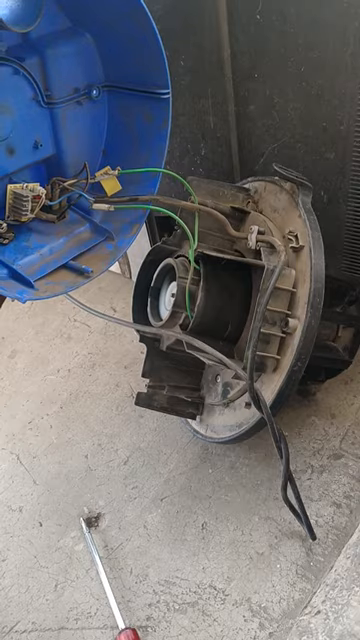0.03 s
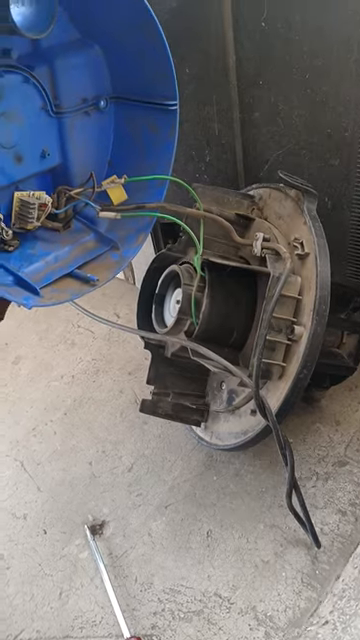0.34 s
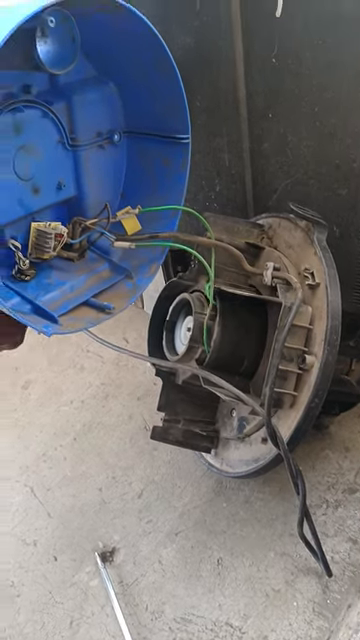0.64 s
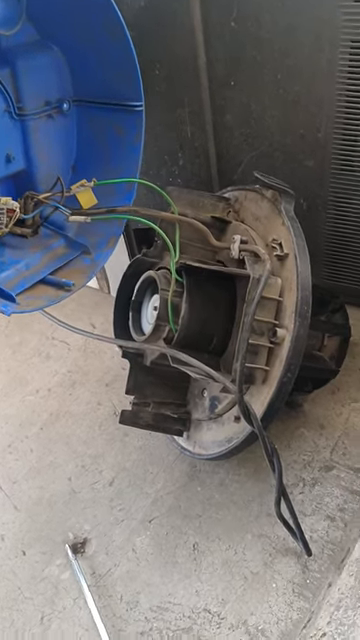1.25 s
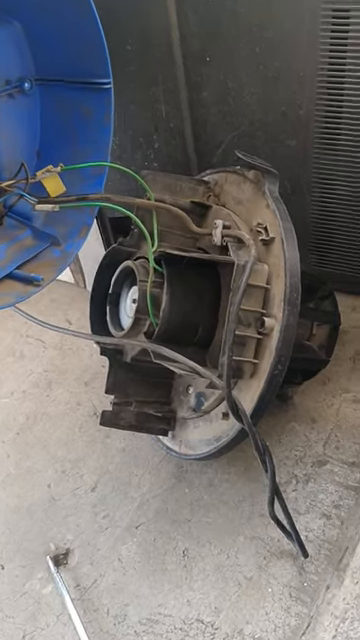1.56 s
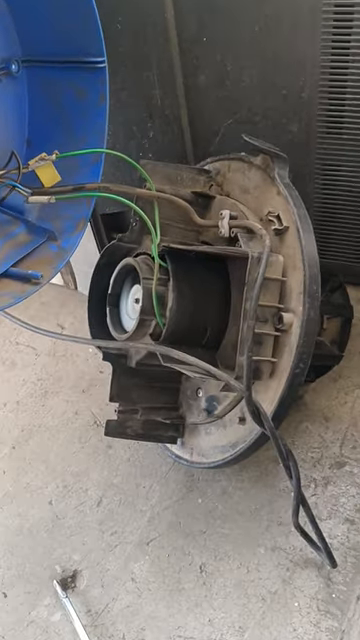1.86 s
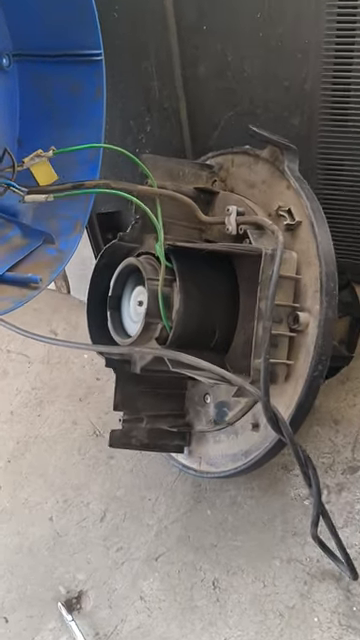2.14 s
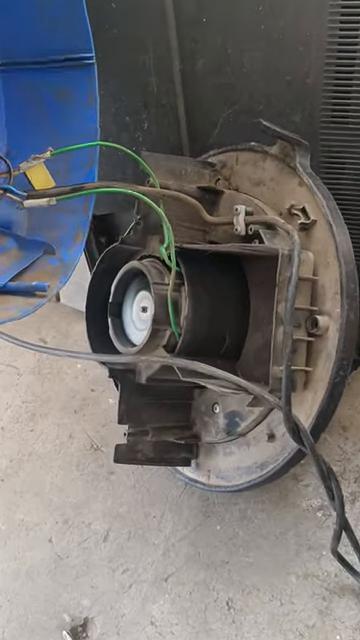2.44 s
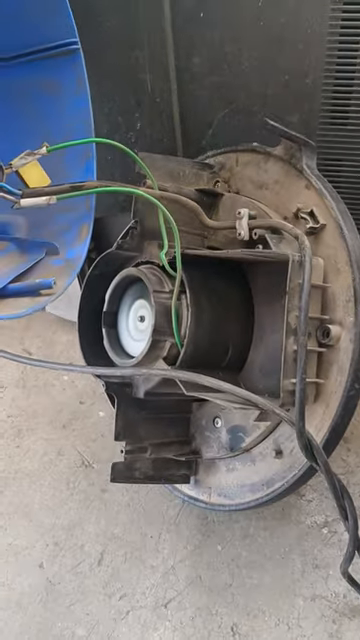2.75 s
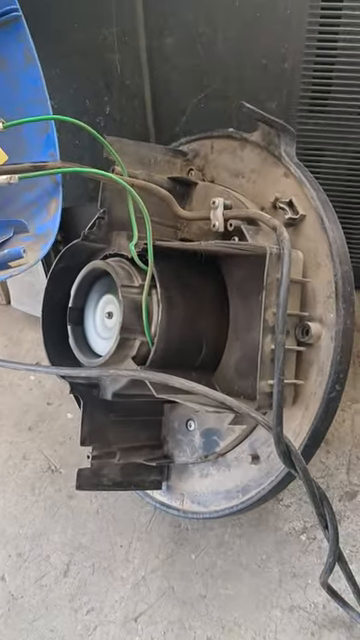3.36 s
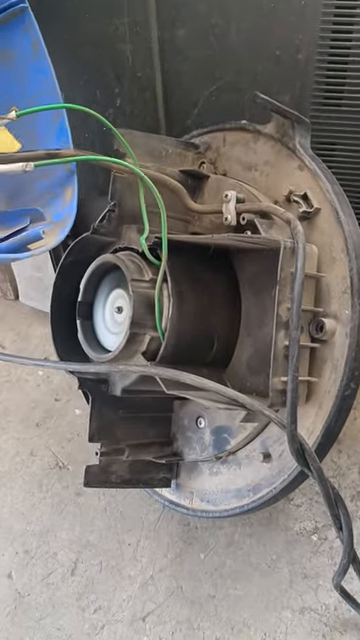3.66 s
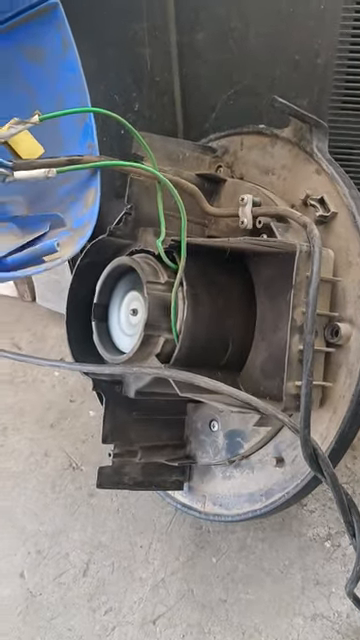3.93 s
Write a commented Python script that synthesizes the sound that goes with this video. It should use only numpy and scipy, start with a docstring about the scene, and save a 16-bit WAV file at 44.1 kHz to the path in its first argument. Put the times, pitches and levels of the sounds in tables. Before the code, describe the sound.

An opened vacuum cleaner motor runs on a concrete floor, heard from about 0.2 seconds with a steady, hissing roar of air. Its wavering whine and hum climb in pitch until about 1.4 seconds, with a faint hoot underneath near 0.7. The pitch holds until 2.2, then falls through to 4 seconds as the motor slows without stopping. The microphone moves in close between 1.7 and 3 seconds.

```python
"""A rising whine over roaring air: an opened vacuum cleaner motor runs on a concrete floor.
It speeds up, holds, then slows as the airflow changes. Two sets of blades whine at 9 and 12 times
the shaft rate, the shaft hums on its first four orders, and air roars through the housing.
The microphone starts a step away and moves in close; standing waves make each tone swell and fade
differently on the two sides. A faint hoot passes once, early on."""
import sys
import numpy as np
from scipy import signal
from scipy.fft import rfft, irfft
from scipy.io import wavfile

SR = 44100
rng = np.random.default_rng(int(sys.argv[2]) if len(sys.argv) > 2 else 0)


def dump(signal):
    """Clip the signal to [-1, 1] and save it as 16-bit WAV at the path in sys.argv[1]."""
    limited = np.clip(np.atleast_2d(signal).T, -1, 1)
    pcm = np.round(limited * 32767).astype(np.int16)
    wavfile.write(sys.argv[1], SR, pcm)


N = 176400
TIME = np.arange(N) / SR
HZ = np.maximum(np.arange(N // 2 + 1) * SR / N, 1)
WHINE_FLUTTER, HUM_FLUTTER = 0.27, 0.2   # share of a tone's amplitude
HUM_LEAD_FAR, HUM_LEAD_NEAR = -1.25, 0.1   # radians, left ahead of right

# Main whine on each side of the microphone. Each row: time in seconds, level in dB before the dips.
MAIN_WHINE_LEFT = [(.2,-29), (.51,-25.5), (.7,-35), (.93,-22), (1.22,-31), (1.75,-40), (1.9,-28),
                   (2.04,-44), (2.31,-21), (2.56,-37), (2.66,-21.5), (2.87,-27), (3.25,-21.5), (3.35,-33),
                   (4.0,-37)]
MAIN_WHINE_RIGHT = [(.25,-21.5), (.62,-24), (.8,-21), (.96,-23), (1.05,-39), (1.17,-24.5), (1.85,-31),
                    (2.05,-40), (2.17,-24), (2.28,-26), (2.36,-23.5), (2.6,-17), (3.15,-17), (3.26,-26),
                    (3.6,-22), (4.0,-19)]
# Its phase across the microphone. Each row: time in seconds, lead of the left side in radians.
MAIN_WHINE_LEAD = [(.2, 2), (.85, 0), (1.05, -0.9), (1.22, 4), (1.55, 3.5), (1.85, 0), (2.25, 3.5),
                   (2.37, -.5), (2.6, 4), (3.25, 1.5), (3.9, 4.5)]
# Its brief dips. Each row: centre in seconds, spread in seconds.
MAIN_WHINE_DIPS = [(.41, .022), (.57, 0.0093), (.64, .025), (2.5, 0.021), (2.81, 0.026), (3.33, 0.044)]
# Upper whine at the microphone. Each row: time in seconds, left and right level in dB.
UPPER_WHINE = [(.19,-52,-52), (.52,-48,-28), (.82,-43,-35), (1.15,-38,-22), (2.25,-36,-28), (2.7,-52,-40),
               (3.3,-49,-27), (3.7,-47,-51)]

def blade_whine(angle, dip_db=11):
    """Nine blades give the main whine, which dips now and then; twelve give a higher one."""
    dips = sum(bell(s, spread_s) for s, spread_s in MAIN_WHINE_DIPS)
    level_db = np.vstack([in_time(MAIN_WHINE_LEFT), in_time(MAIN_WHINE_RIGHT)]) - dip_db * dips
    main = tone(9 * angle, level_db, in_time(MAIN_WHINE_LEAD), WHINE_FLUTTER)
    upper = tone(12 * angle, in_time(UPPER_WHINE), lead=-2.2, flutter=WHINE_FLUTTER)
    return main + upper


# Air spectrum before flow, band gains and housing; the middle is heard a step away and close up.
# Each row: frequency in Hz, left and right density in dB per Hz.
ROAR_BASS = [(48.3, -92, -92), (69.4, -71.5, -74), (92, -72.5, -75.5), (139.6, -61.5, -61), (234, -66, -68)]
ROAR_MIDDLE_FAR = [(620, -67, -64), (1220, -62.5, -59), (1360, -69, -67.5), (1730, -62.5, -57.5),
                   (2300, -58, -60.5), (3200, -62, -57), (4530, -63, -57), (6070, -63.5, -53.5)]
ROAR_MIDDLE_NEAR = [(332, -62, -58), (676, -64, -63), (984, -60, -63.5), (1130, -54.5, -55.5),
                    (1420, -61, -65), (2420, -61, -57), (3600, -59, -54), (4400.0, -62.5, -60),
                    (6060, -65, -53.5)]
ROAR_TREBLE = [(6600, -67.2, -65.5), (7920, -60.5, -73.5), (9190, -68.5, -79), (11260, -78.5, -76.3),
               (15400, -73, -70.2)]
# Swell of the whole airflow, and of its rumble alone. Each row: time in seconds, gain in dB.
FLOW_GAIN = [(.22, -7), (.35, 0.5), (.6, 1), (1.4, -0.05), (1.7, .5), (2.6, 0), (2.85, 0.8), (3.06, -2),
             (3.22, 0.9), (4.0, -0.8)]
RUMBLE_GAIN = [(.5, 4), (1.0, 0), (2.75, -4), (3.25, 0), (4.0, -1)]

def air_roar(speed, rumble_top_hz=201, hiss_from_hz=8000, hiss_db_per_doubling=8.5):
    """Turbulent air through the housing: a low rumble, the roar, and a hiss that grows with speed."""
    noise = turbulence()
    low = 1 / (1 + (HZ / rumble_top_hz) ** 8)
    high = 1 - 1 / (1 + (HZ / hiss_from_hz) ** 8)
    hiss_gain = from_db(hiss_db_per_doubling * np.log2(speed / speed.mean()))
    bands = [(low, from_db(in_time(RUMBLE_GAIN))), (1 - low - high, 1), (high, hiss_gain)]
    air, near = 0, nearness()
    for middle, share in ((ROAR_MIDDLE_FAR, 1 - near), (ROAR_MIDDLE_NEAR, near)):
        spectrum = noise * from_db(over_hz(ROAR_BASS + middle + ROAR_TREBLE))
        air = air + share * sum(gain * irfft(spectrum * band, N) for band, gain in bands)
    return housing(air) * from_db(in_time(FLOW_GAIN))


# How alike the air sounds on the two sides of the microphone.
# Each row: frequency in Hz, coherence from 0 to 1, lead of the left side in radians.
AIR_COHERENCE = [(200, 0.9, 0), (630, 0.84, -0.98), (990, 0.55, -1.6), (1195, 0.13, .5), (2480, 0.17, 0.4),
                 (3210, 0.43, 3), (4960, 0.04, 2.5)]

def turbulence():
    """Flat stereo spectrum of rushing air, nearly alike on both sides in the bass, wide in the treble."""
    coherence, lead = over_hz(AIR_COHERENCE)
    coherence = np.clip(coherence, 0, 1)
    white = rfft(rng.standard_normal((2, N))) * np.sqrt(SR) / 2
    mid, side = white * np.sqrt([1 + coherence, 1 - coherence])
    return np.array([(mid + side) * np.exp(1j * lead), mid - side])


# Resonances and one hollow of the housing, heard from certain places only. Each row: centre and
# width in Hz, left and right gain in dB, strongest moment and spread in seconds.
HOUSING_RESONANCES = [(2350, 230, 8.5, 5, 0.46, 0.68), (1820, 90, 5, 3.5, 0.54, 0.63),
                      (2590, 180, 8, 4.5, 1.86, .22), (1780, 830, -2.5, -3, 2.82, 0.41),
                      (2330, 130, 6, 5.5, 3.25, 1), (1630, 140, -1, 6, 3.86, 0.76)]

def housing(air):
    """Each resonance or hollow colours the air while the microphone passes through it."""
    for hz, width_hz, left_db, right_db, s, spread_s in HOUSING_RESONANCES:
        band = irfft(rfft(air) / (1 + (2 * (HZ - hz) / width_hz) ** 2), N)
        gain = from_db(np.outer([left_db, right_db], bell(s, spread_s)))
        air = air + band * (gain - 1)
    return air


# Shaft orders 1 and 2 at the microphone. Each row: time in seconds, left and right level in dB.
HUM_1 = [(.19,-50,-46), (.67,-42,-25.5), (.85,-45,-35.5), (1.2,-36,-33.5), (2.42,-36.5,-31), (2.68,-46,-49),
         (2.87,-33.5,-42), (3.2,-48,-39), (3.67,-34,-32), (3.99,-40.5,-38)]
HUM_2 = [(.3,-47,-52), (.58,-37,-36), (.72,-39,-37.5), (.95,-30,-27.5), (1.87,-43,-32.5), (2.27,-53,-28),
         (2.43,-31.5,-40), (2.67,-39.5,-40.5), (3.31,-31,-31), (3.99,-41,-41.5)]
# Orders 3 and 4, equally loud on both sides. Each row: time in seconds, level in dB.
HUM_3 = [(.19,-57), (1.5,-39), (2.33,-41.5), (2.6,-50), (4.0,-48)]
HUM_4 = [(.19,-45), (1.05,-32.5), (1.4,-46), (2.05,-35.5), (2.6,-55), (3.35,-35.5), (3.99,-45)]

def shaft_hum(angle):
    """The unbalanced rotor hums on four orders; close up, the two sides are almost in phase."""
    lead = HUM_LEAD_FAR + (HUM_LEAD_NEAR - HUM_LEAD_FAR) * nearness()
    return sum(tone(order * angle, in_time(levels), lead, HUM_FLUTTER)
               for order, levels in enumerate((HUM_1, HUM_2, HUM_3, HUM_4), 1))


def hoot(start_s=0.61, length_s=0.287, base_hz=597, rise_hz=57.8, peak_db=-38):
    """A faint short tone rises and falls once under the roar."""
    arch = np.sin(np.pi * np.clip((TIME - start_s) / length_s, 0, 1))
    angle = 2 * np.pi * np.cumsum(base_hz + rise_hz * arch ** 2) / SR
    return np.sqrt(np.abs(arch)) * tone(angle, peak_db, HUM_LEAD_FAR, WHINE_FLUTTER)


def tone(angle, level_db, lead, flutter, flutter_hz=27):
    """One stereo partial, shaken in strength and phase by turbulence; left leads by `lead` radians."""
    gusts = np.array([drift(flutter_hz) + 1j * drift(flutter_hz) for side in range(2)])
    shaken = 1 + flutter * gusts / np.sqrt(2)
    phase = angle + rng.uniform(0, 2 * np.pi) + lead * np.array([[.5], [-.5]])
    return np.sqrt(2) * from_db(level_db) * (shaken * np.exp(1j * phase)).real


def nearness(start_s=1.73, end_s=2.97):
    """0 while the microphone is a step from the motor, 1 once it is close."""
    return np.clip((TIME - start_s) / (end_s - start_s), 0, 1)


def drift(corner_hz):
    """Slow random wander with a spread of 1."""
    slow = irfft(rfft(rng.standard_normal(N)) / (1 + (HZ / corner_hz) ** 2), N)
    return slow / slow.std()


def bell(centre_s, spread_s):
    """A smooth swell to 1 and back."""
    return np.exp(-((TIME - centre_s) / spread_s) ** 2)


def from_db(db):
    """Decibels to gain."""
    return 10 ** (np.asarray(db) / 20)


def in_time(rows):
    """The columns of a curve at every sample."""
    s, *columns = np.transpose(rows)
    return np.array([np.interp(TIME, s, column) for column in columns])


def over_hz(rows):
    """The columns of a spectrum at every frequency."""
    hz, *columns = np.transpose(rows)
    return np.array([np.interp(np.log(HZ), np.log(hz), column) for column in columns])


# The motor's run on the floor. Each row: time in seconds, shaft speed in turns per second.
SHAFT_SPEED = [(0.18, 385.3), (0.4, 411.4), (0.7, 449.6), (1.0, 473.0), (1.4, 485.1), (1.8, 489.6),
               (2.05, 486.4), (2.2, 479.4), (2.32, 465.0), (2.45, 442.3), (2.7, 406.3), (3.0, 378.0),
               (3.5, 351.5), (4.0, 338.7)]

def shaft_speed():
    """The heavy rotor changes speed smoothly, along a cubic spline."""
    s, turns_per_s = np.transpose(SHAFT_SPEED)
    cubic = np.abs(s[:, None] - s) ** 3
    linear = np.array([np.ones(len(s)), s])
    system = np.block([[cubic, linear.T], [linear, np.zeros((2, 2))]])
    *weights, offset, slope = np.linalg.solve(system, np.append(turns_per_s, [0, 0]))
    bends = sum(weight * np.abs(TIME - at) ** 3 for weight, at in zip(weights, s))
    return bends + offset + slope * TIME


def scene():
    """One slightly unsteady shaft drives hum, whine and air; the hoot lies beneath them."""
    speed = shaft_speed()
    jitter = 1 + 0.0007 * drift(corner_hz=25)
    angle = 2 * np.pi * np.cumsum(speed * jitter) / SR
    return shaft_hum(angle) + blade_whine(angle) + air_roar(speed) + hoot()


def record(dry, start_s=0.179, fade_s=0.021, cutoff_hz=16000):
    """The microphone opens with a quick fade; the top is cut steeply."""
    opened = dry * np.clip((TIME - start_s) / fade_s, 0, 1)
    lowpass = signal.ellip(14, .1, 90, cutoff_hz, fs=SR, output="sos")
    return signal.sosfilt(lowpass, opened)


dry = scene()
out = record(dry)
dump(out)
```